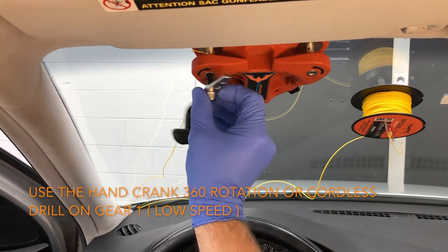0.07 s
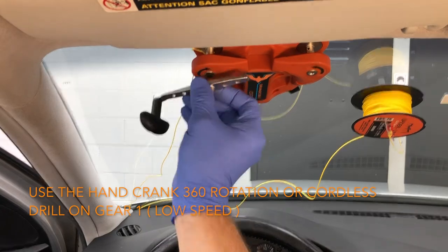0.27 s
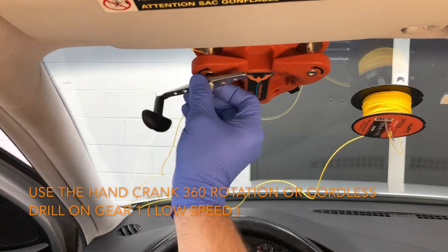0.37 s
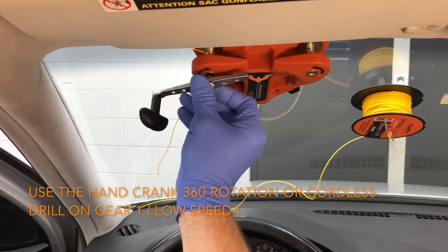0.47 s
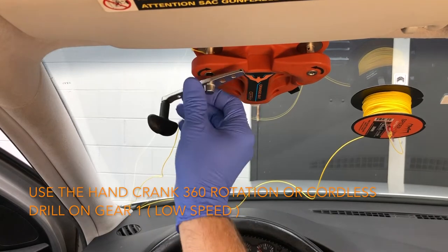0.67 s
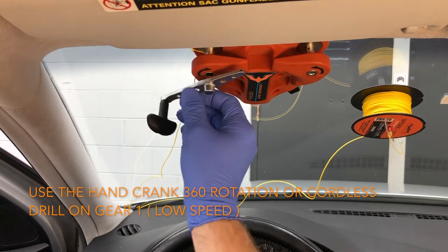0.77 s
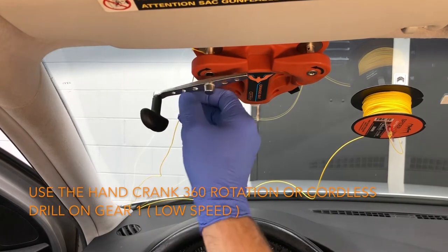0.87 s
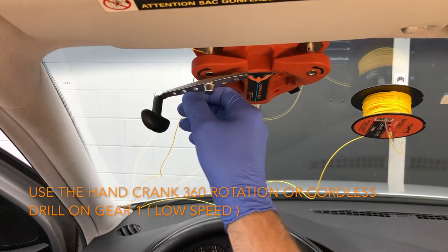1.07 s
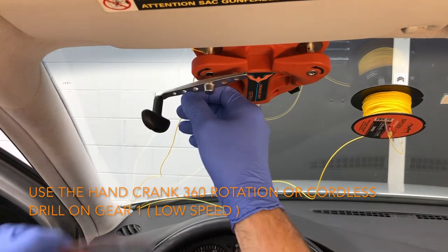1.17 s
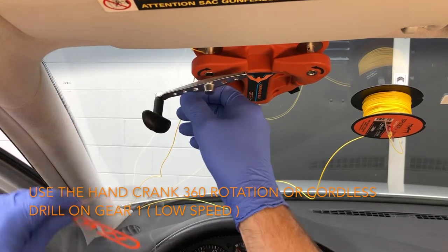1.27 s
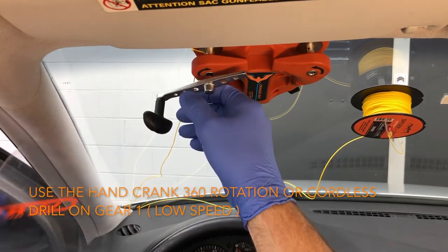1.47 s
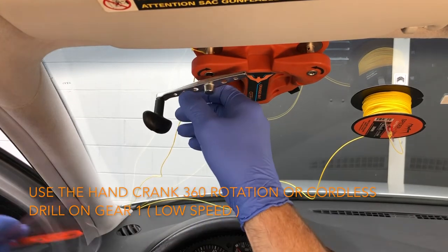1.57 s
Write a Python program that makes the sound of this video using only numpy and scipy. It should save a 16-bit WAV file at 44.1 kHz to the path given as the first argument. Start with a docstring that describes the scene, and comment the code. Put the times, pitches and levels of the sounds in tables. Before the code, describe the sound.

A steel hand crank clicks loose at about 0.2 seconds, judders, and clacks home sharply at 0.3 seconds, with a brief ring and a dull thud from the car's windscreen. Small ticks follow near 0.4 and 0.85 seconds. Faint, short metal scrapes come between 0.9 and 1.4 seconds, with barely audible glove rubbing and thin squeaks. Everything sounds close and dry in the quiet cabin.

```python
"""Steel crank on a windscreen

A gloved hand works the steel crank of a winder stuck to a car's windscreen, heard from inside.
The crank clicks loose, judders and clacks home, ringing its housing and making the glass thud.
Small ticks, short metal scrapes, soft rubbing and a few thin squeaks follow in the dead, close cabin."""
import sys
import numpy as np
from scipy import signal
from scipy.fft import rfft, irfft
from scipy.io import wavfile
from scipy.ndimage import uniform_filter1d

SR = 44100
rng = np.random.default_rng(int(sys.argv[2]) if len(sys.argv) > 2 else 0)


def generate_wav(signal):
    """Clip the signal to [-1, 1] and save it as 16-bit WAV at the path in sys.argv[1]."""
    frames = np.transpose(np.atleast_2d(signal))
    scaled = np.clip(frames, -1, 1) * 32767
    pcm = np.round(scaled).astype(np.int16)
    wavfile.write(sys.argv[1], SR, pcm)


N = 70560
T = np.arange(N) / SR
FREQS = np.maximum(np.arange(N + 1) * SR / (2 * N), 1)

# Hits of the crank. Each row: start in seconds, then relative levels in dB of the crack, housing ring,
# glass thud and steel ring, then the crack's tilt in dB per octave.
CRANK_HITS = [(0.2194, -22.5, -33, -20, -34.5, 2), (0.2225, -20, -29, -20.5, -31, 2),
              (0.2259, -22, -32.5, -14, -30, 1), (0.3129, 1.5, 0, 3.5, -0.5, -4),
              (0.3166, -13.5, -17.5, -3.5, -15, -6.5)]
# The bright snap of contact. Each row: frequency in Hz, relative level in dB.
CRACK_TONE = [(300, -11.5), (900, -6), (1500, 8.5), (1900, 1.5), (2400, -1), (4000, 5), (6500, -7),
              (9000, -10), (11500, 0), (14000, -19.5), (17000, -21.5)]
# The three bodies that ring. Each row: pitch in Hz, relative level in dB, seconds to fade by 60 dB.
HOUSING_MODES = [(640, -34.5, 0.12), (691, -35.5, 0.13), (781, -31, 0.056), (866, -21, .05),
                 (926, -21.5, .05), (1116, -20.5, 0.036), (1200, -25.5, 0.047), (1298, -28, 0.022),
                 (1487, -21, 0.025), (1556, -22.5, 0.042), (1644, -27, 0.055), (2220, -28, 0.049),
                 (2315, -23.5, 0.027), (2517, -24, 0.018), (2997, -29.5, 0.057), (3427, -35.5, 0.059),
                 (3810, -26, 0.0086), (4026, -25, 0.02), (5064, -28.5, 0.045)]
GLASS_MODES = [(147.3, -30, 0.37), (182, -30.5, 0.21), (244.5, -24.5, 0.08), (276, -23, 0.085),
               (361.5, -23, .11), (414, -18.5, 0.092), (500, -30, .09)]
STEEL_MODES = [(10970, -26, 0.0096), (11450, -40.5, 0.051), (13700, -28, 0.0095), (14230, -16, 0.01),
               (14200, -39, 0.029)]
def clacks():
    """Each hit cracks, rings the housing and the steel crank, and sets the glass and mount swinging."""
    starts, crack_db, housing_db, thud_db, steel_db, tilts = np.transpose(CRANK_HITS)
    cracks = 0
    for k, tilt_db in enumerate(tilts):
        snap = colour(rng.standard_normal(N), CRACK_TONE, tilt_db=tilt_db) * decay(t60=0.0075)
        cracks = cracks + strike(starts[[k]], crack_db[[k]] - 12.5, snap)
    swell = 1 - np.exp(-T / 0.0034)  # the glass takes a few milliseconds to get moving
    glass = strike(starts, thud_db, ringing(GLASS_MODES) * swell)
    housing = strike(starts, housing_db, ringing(HOUSING_MODES))
    steel = strike(starts, steel_db, ringing(STEEL_MODES))
    return cracks + housing + glass + steel


# The hand shakes the mount. Each row: start in seconds, length in seconds, relative level in dB,
# fall over the stroke in dB, tilt in dB per octave.
MOUNT_SHAKES = [(0.0, 0.07, -59.5, 10, -6), (0.074, 0.054, -54.5, 7, 3.5), (0.169, 0.09, -49.5, -21.5, 5),
                (0.22, 0.039, -31, -0.5, -0.5), (0.267, 0.033, -39.5, -3, 5), (0.367, 0.059, -49.5, 3, 6),
                (0.612, 0.072, -60.5, -3.5, 7.5), (0.667, 0.051, -53.5, 14.5, -9.5),
                (0.818, 0.054, -50, -3, 4), (0.961, 0.05, -54, 16, -7), (1.054, 0.033, -48, 9, -2.5),
                (1.104, 0.013, -51.5, 0.5, 1), (1.125, 0.11, -59.5, 4, 9.5), (1.531, 0.031, -62.5, -4, 2)]
# A dull, low rumble. Each row: frequency in Hz, relative level in dB.
JUDDER_TONE = [(40, -25.5), (60, -9), (100, -22.5), (145, -2), (250, 1), (350, -4.5), (480, -7),
               (650, -15.5), (1200, -29), (3000, -42.5), (8000, -63.5)]
def judder(cutoff_hz=2600):
    """The mount judders dully, strongest at the modes of the glass."""
    glass_peaks = [(hz, 60, 6) for hz, _, _ in GLASS_MODES]  # 60 Hz wide, 6 dB up
    out = 0
    for *shape, tilt_db in MOUNT_SHAKES:
        rumble = colour(rng.standard_normal(N), JUDDER_TONE, glass_peaks, tilt_db)
        out = out + rumble * stroke(*shape, attack_s=0.0047, t60=0.12)
    return signal.sosfilt(signal.butter(3, cutoff_hz, fs=SR, output="sos"), out)


# Light ticks of the mechanism. Each row: start in seconds, relative level in dB.
TICK_HITS = [(0.069, -37.5), (0.270, -32), (0.397, -31), (0.463, -44), (0.855, -32.5)]
# A hard, mid-forward click. Each row: frequency in Hz, relative level in dB.
TICK_TONE = [(300, 1), (1200, 12.5), (3500, 7.5), (5500, -3.5), (8000, -19), (16000, -15.5)]
def ticks():
    """Light contacts click, too weak to move the glass."""
    starts, levels_db = np.transpose(TICK_HITS)
    click = colour(rng.standard_normal(N), TICK_TONE) * decay(t60=0.014)
    return strike(starts, levels_db - 21.5, click)


# Metal slides on metal. Each row: start in seconds, length in seconds, level in dB,
# fall over the stroke in dB, tilt in dB per octave, boost of the hollow ring in dB.
SCRAPE_STROKES = [(0.225, 0.013, -50.5, 9.5, 2, 0.5), (0.9423, 0.0072, -44, 0, -1, 11),
                  (0.956, 0.0043, -55.5, -8, 3, 21), (1.044, 0.0076, -53.5, -13.5, .5, -1),
                  (1.06, 0.0034, -46.5, 0, 2, 18), (1.089, 0.024, -60.5, -7, 0, 9.5),
                  (1.108, .024, -54, -5.5, -2, 7.5), (1.303, .035, -48.5, -5.5, -2, 4.5),
                  (1.331, 0.05, -53.5, 3.5, 2.45, 11)]
# The body of the scrape. Each row: frequency in Hz, relative level in dB.
SCRAPE_TONE = [(290, -9), (500, -5), (880, -5), (1060, -0.5), (1460, -5.5), (1900, -4), (2100, -10.5),
               (2290, -4.5), (5470, -12.5), (6330, -15.5), (16000, -28)]
# Its metallic edge. Each row: centre in Hz, width in Hz, boost in dB.
SCRAPE_PEAKS = [(1960, 91, 5.5), (2380, 300, 3.5), (3468, 100, 9), (4000, 210, 5), (5250, 220, 6.5),
                (7430, 180, 6)]
def scrapes(hollow_hz=1040, hollow_width_hz=130):
    """The crank grates in its socket: tiny collisions excite the metal's resonances."""
    out = 0
    for *shape, tilt_db, hollow_db in SCRAPE_STROKES:
        peaks = [*SCRAPE_PEAKS, (hollow_hz, hollow_width_hz, hollow_db)]
        grit = colour(grains(), SCRAPE_TONE, peaks, tilt_db)
        out = out + grit * stroke(*shape, attack_s=0.0019, t60=0.067)
    return out


# Pushes on the glass. Each row: start in seconds, level in dB.
GLASS_PUSHES = [(0.225, -42.5), (0.315, -49.5), (0.40, -49.5), (1.125, -50.5), (1.372, -53)]
def booms(air_mode_hz=61.4, rise_s=0.019):
    """The cabin's lowest air mode swells and fades after each push."""
    starts, levels_db = np.transpose(GLASS_PUSHES)
    swell = T / rise_s * np.exp(1 - T / rise_s)
    return strike(starts, levels_db, swell * np.sin(2 * np.pi * air_mode_hz * T))


# Glove moves. Each row: start in seconds, length in seconds, level in dB, fall over the stroke in dB.
GLOVE_STROKES = [(0.64, 0.11, -72, -15), (0.744, 0.013, -69.5, 0), (0.843, 0.082, -74.5, 4),
                 (1.13, 0.12, -74.5, 4), (1.435, 0.019, -68, 3), (1.517, 0.075, -70, -8)]
# A soft, broad hiss. Each row: frequency in Hz, relative level in dB.
GLOVE_TONE = [(300, 1.5), (1100, 9.5), (2000, 0), (4500, 2), (8000, -3.5), (12000, -5.5), (16000, -15)]
def glove_rubs():
    """The sliding glove makes a fine-grained hiss."""
    return sum(colour(grains(), GLOVE_TONE) * stroke(*shape, attack_s=0.011, t60=0.19)
               for shape in GLOVE_STROKES)


# Thin squeaks. Each row: start in seconds, length in seconds, opening, top and closing pitch in Hz,
# place of the top from 0 to 1, level in dB.
SQUEAK_ARCS = [(0.565, .085, 7000, 7900, 6400, .38, -83), (0.965, .06, 8700, 9080, 8600, .5, -83),
               (0.975, .06, 12050, 12200, 11900, .4, -85), (1.130, .122, 7700, 9550, 6900, .64, -75.5),
               (1.128, .116, 9650, 11650, 9100, .68, -75.5), (1.16, .075, 7600, 8450, 7200, .65, -77)]
def squeaks(wobble_hz=55, flutter_db=3):
    """Faint friction whistles whose pitch arches with the speed of sliding."""
    out = 0
    for start, length, open_hz, top_hz, close_hz, top_at, db in SQUEAK_ARCS:
        progress = np.clip((T - start) / length, 0, 1)
        rise = (open_hz - top_hz) * (1 - progress / top_at) ** 2
        fall = (close_hz - top_hz) * ((progress - top_at) / (1 - top_at)) ** 2
        hz = top_hz + np.where(progress < top_at, rise, fall) + wobble_hz * waver(samples=60)
        gain = from_db(db + flutter_db * waver(samples=250))
        fade = np.sqrt(np.abs(np.sin(np.pi * progress)))
        out = out + gain * fade * np.sin(2 * np.pi * np.cumsum(hz) / SR)
    return out


# The dead cabin. Each row: frequency in Hz, seconds to fade by 60 dB.
CABIN_DECAY = [(150, 0.067), (500, 0.1), (1500, 0.099), (5000, 0.077), (14000, 0.046)]
def cabin_reverb(x, send_db=-11, predelay_s=0.0011):
    """Close reflections blur into a short, dense tail that dies soonest in the high treble."""
    tail, white = 0, rng.standard_normal((2, N))
    edges_hz = np.geomspace(80, 18000, 9)
    for k, (low, high) in enumerate(zip(edges_hz, edges_hz[1:])):
        band = signal.sosfilt(signal.butter(2, [low, high], "band", fs=SR, output="sos"), white[k % 2])
        band = band * decay(at_hz(CABIN_DECAY, np.sqrt(low * high))) * (T > predelay_s)
        tail = tail + unit_rms(band) * np.sqrt(2 * (high - low) / SR / N)  # equal energy per Hz
    return from_db(send_db) * signal.fftconvolve(x, tail)[:N]


# Dark room tone. Each row: frequency in Hz, relative level in dB.
AIR_TONE = [(25, -12.5), (64, -2.5), (114, 0.5), (161, 2.5), (212, -6.5), (335, -6.5), (440, -12.5),
            (700, -16.5), (1330, -18.5), (2280, -29.5), (5000, -32.5), (11300, -40), (16000, -41)]
def background(air_db=-61.5, drone_db=-65, drone_hz=61):
    """Quiet workshop air and a low, wavering drone of narrow-band noise."""
    resonance = signal.iirpeak(drone_hz, Q=drone_hz / 22, fs=SR)
    drone = signal.lfilter(*resonance, rng.standard_normal(2 * N))
    drone = signal.lfilter(*resonance, drone)[N:]  # narrow it again and keep the settled half
    air = colour(rng.standard_normal(N), AIR_TONE)
    return from_db(air_db) * air + from_db(drone_db) * unit_rms(drone)


def ringing(modes, blur=0.008):
    """A struck body: neighbouring modes swing against each other, and loose joints blur their pitch."""
    out = 0
    for k, (hz, db, t60) in enumerate(modes):
        width_hz = blur * hz
        drift = np.cumsum(rng.standard_normal(N)) * np.sqrt(2 * np.pi * width_hz / SR)
        out = out + (-1) ** k * from_db(db) * decay(t60) * np.sin(2 * np.pi * hz * T + drift)
    return out


def strike(starts, levels_db, sound):
    """Trigger a sound at each hit."""
    hits = np.zeros(N)
    np.add.at(hits, (starts * SR).astype(int), from_db(levels_db))
    return signal.fftconvolve(hits, sound)[:N]


def stroke(start, length, db, fall_db, attack_s, t60):
    """Envelope of a stroke: attack, sloping hold, release. A negative fall is a swell."""
    attack = np.clip((T - start) / attack_s, 0, 1)
    hold_db = db - fall_db * (np.clip((T - start) / length, 0, 1) - 0.5)
    release_db = 60 * np.maximum(T - start - length, 0) / t60
    return attack * from_db(hold_db - release_db)


def grains(per_second=7000, spread_db=1.5):
    """Friction as dense, tiny collisions of uneven size."""
    collisions = rng.random(N) < per_second / SR
    sizes = from_db(spread_db * rng.standard_normal(N))
    return collisions * sizes * rng.choice([-1, 1], N)


def colour(x, tone, peaks=(), tilt_db=0):
    """EQ a steady signal with a tone curve, a tilt per octave and resonant peaks; unit power."""
    db = at_hz(tone, FREQS) + tilt_db * np.log2(np.maximum(FREQS, 100))
    db = db + sum(boost / (1 + (2 * (FREQS - hz) / width) ** 2) for hz, width, boost in peaks)
    spectrum = rfft(np.tile(x, 2)) * from_db(db - db.max())
    return unit_rms(irfft(spectrum)[:N])


def waver(samples):
    """Random motion smoothed over so many samples; unit spread."""
    return unit_rms(uniform_filter1d(uniform_filter1d(rng.standard_normal(N), samples), samples))


def decay(t60):
    """Fade by 60 dB every t60 seconds."""
    return from_db(-60 * T / t60)


def at_hz(curve, hz):
    """Read a curve on a log-frequency axis."""
    freqs, values = np.transpose(curve)
    return np.interp(np.log(hz), np.log(freqs), values)


def from_db(db):
    """Decibels to gain."""
    return 10 ** (np.asarray(db) / 20)


def unit_rms(x):
    """Scale to unit power."""
    return x / np.sqrt(np.mean(x ** 2) + 1e-20)


def scene():
    """Mono mix: clacks, ticks, scrapes and rubs feed the cabin reverb; the rest stays dry."""
    contacts = clacks() + ticks() + scrapes() + glove_rubs()
    return (contacts + cabin_reverb(contacts) + squeaks() + judder() + booms() + background())[None]


def record(dry, low_cut_hz=34, ceiling=0.6, high_cut_hz=16200):
    """The deep bass is cut away, peaks are rounded, the top is cut steeply."""
    x = signal.sosfilt(signal.butter(3, low_cut_hz, "high", fs=SR, output="sos"), dry)
    x = ceiling * np.tanh(x / ceiling)
    return signal.sosfilt(signal.ellip(10, 0.1, 80, high_cut_hz, fs=SR, output="sos"), x)


dry = scene()
out = record(dry)
generate_wav(out)
```